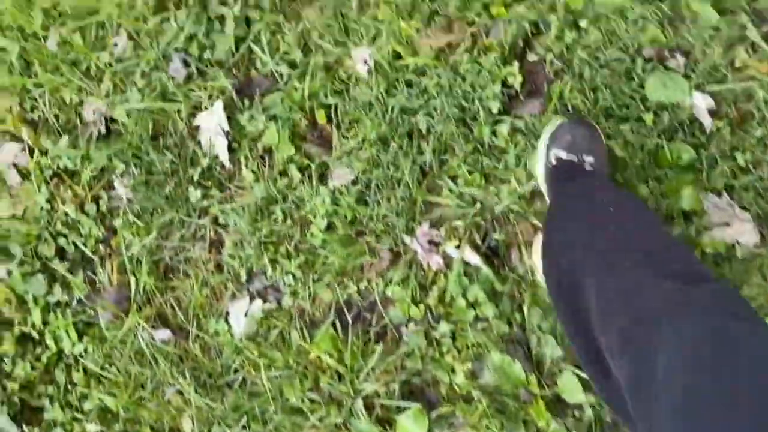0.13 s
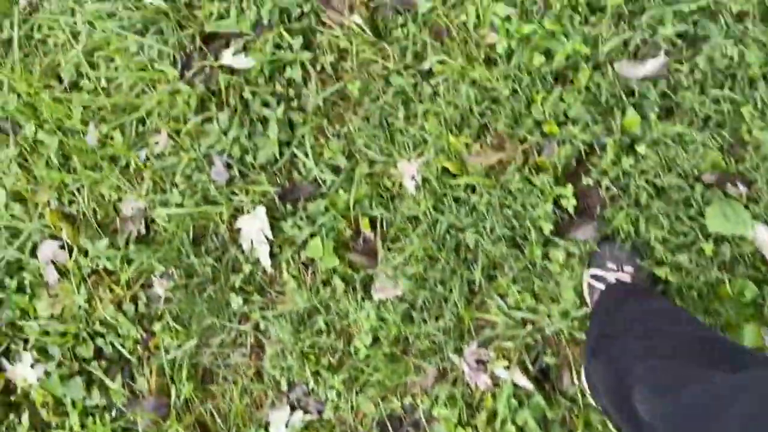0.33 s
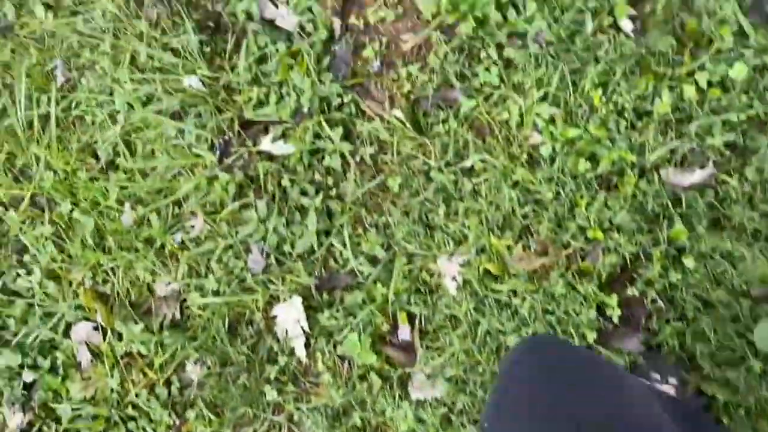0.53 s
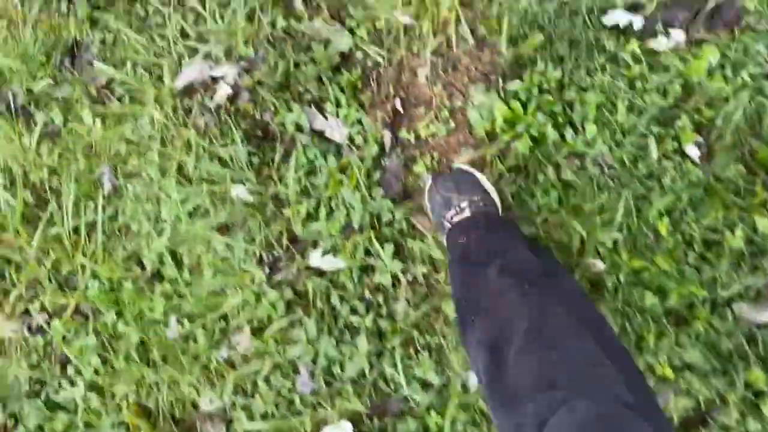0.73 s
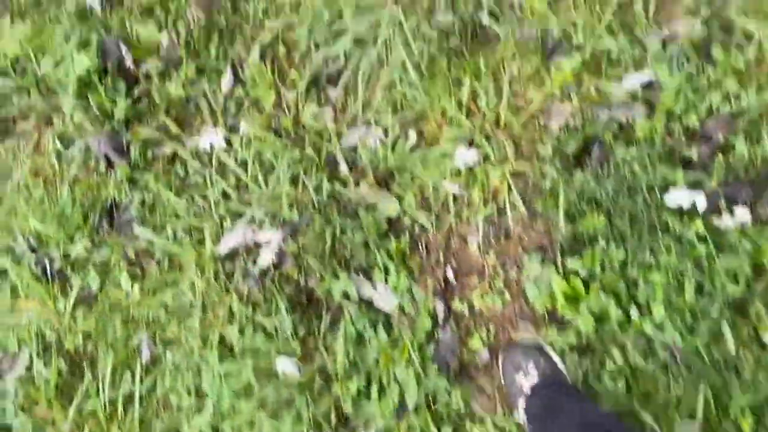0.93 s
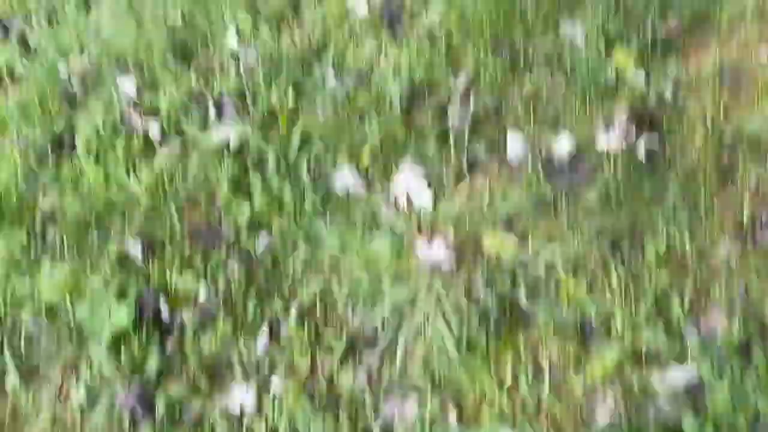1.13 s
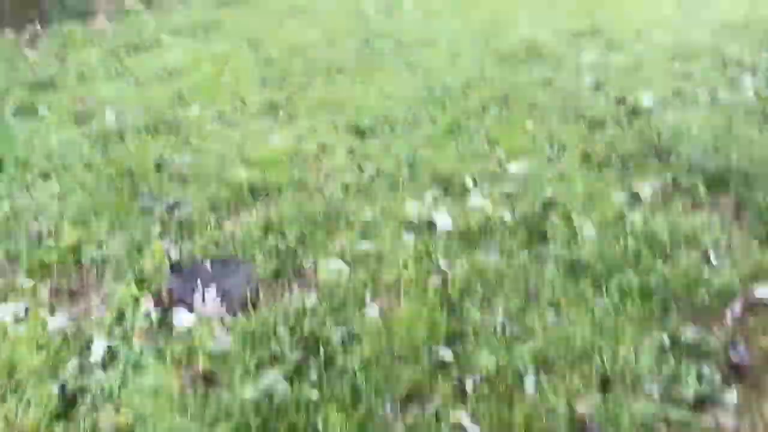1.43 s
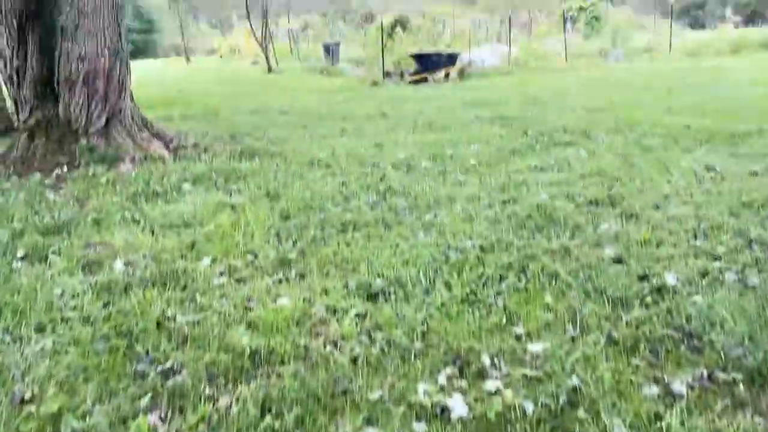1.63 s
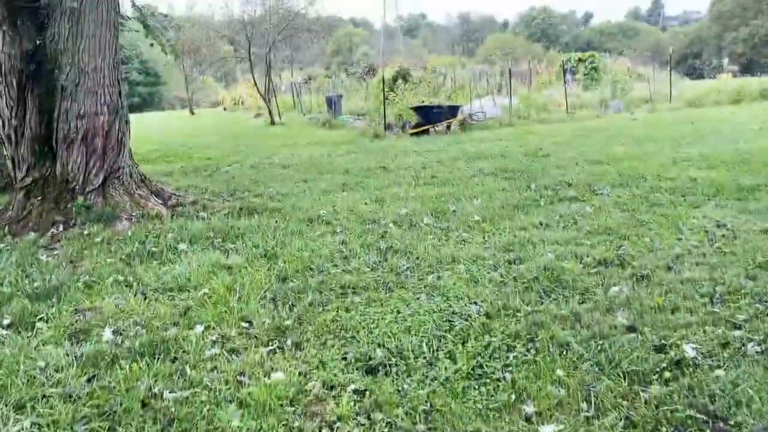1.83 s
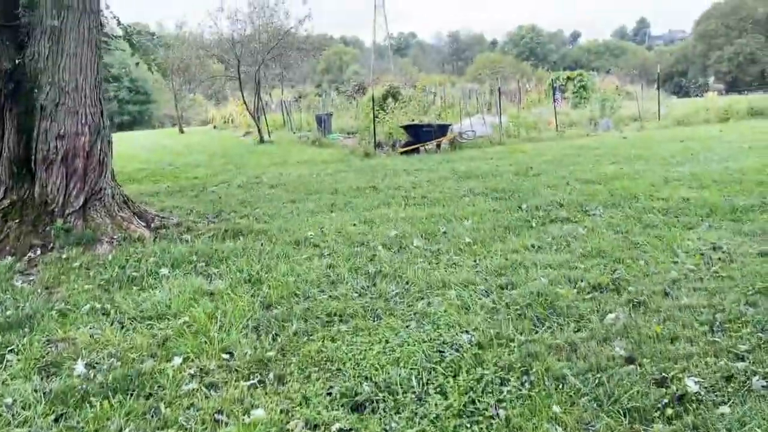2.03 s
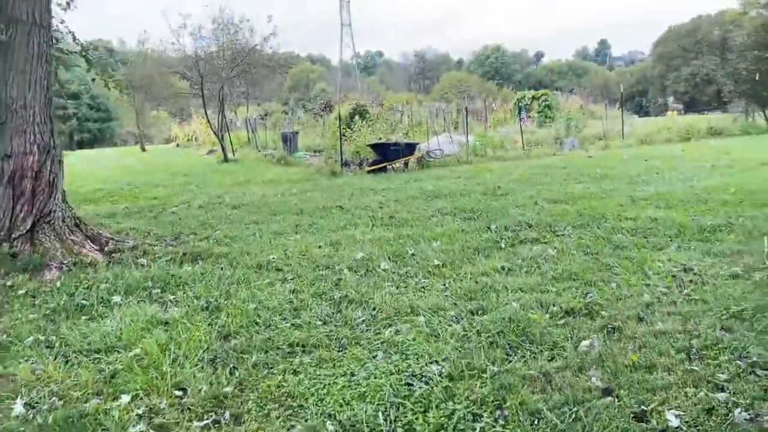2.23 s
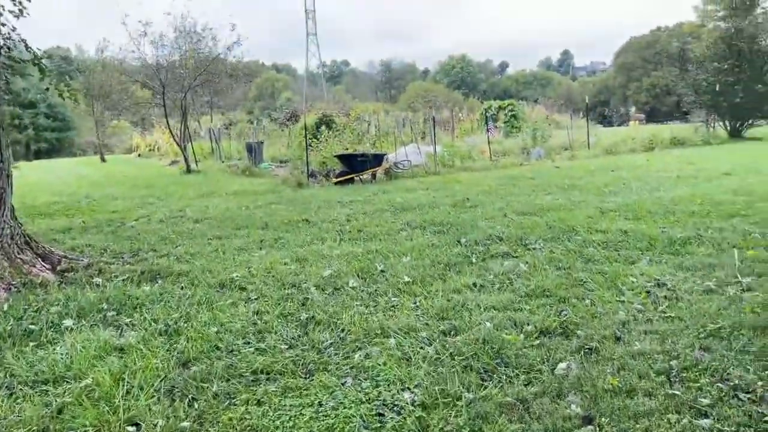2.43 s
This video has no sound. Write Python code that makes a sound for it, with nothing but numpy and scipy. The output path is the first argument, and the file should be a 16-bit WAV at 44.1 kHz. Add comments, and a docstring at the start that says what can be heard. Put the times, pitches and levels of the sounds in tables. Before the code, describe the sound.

Someone walks across an open lawn: brushing grass steps, dull low jolts and soft air rumble, then sparser steps as left-side cricket chirps grow clearer, with a far hollow knock and a last leaf crack.

```python
"""A walk across a lawn with a stereo microphone in the hand, 2.6 s, in order of time.
From the start: far insect hiss, two crickets trilling to the left, and close by, shoes swishing through grass (ticking
blades over noise), dry leaves snapping (cracks into resonances), jolts in the housing (sagging low swings with puffs)
and air rumbling on the ports (coloured noise). From 1.1 s a far dove coos (a gliding sine); from 1.85 s a third
cricket chirps in groups; at 2.2 s something knocks far off (noise hits into resonances); the last leaves snap at 2.3 s."""
import sys
import numpy as np
from scipy import signal
from scipy.fft import rfft, irfft
from scipy.io import wavfile

SR = 44100
rng = np.random.default_rng(int(sys.argv[2]) if len(sys.argv) > 2 else 0)


def inscribe(sig):
    """Save sig as 16-bit PCM at rate SR to the path in sys.argv[1].

    A 1-D sig is mono; a 2-D sig holds one channel per row.
    Samples are clipped to [-1, 1] before scaling.
    """
    pcm = np.round(np.clip(np.atleast_2d(sig).T, -1, 1) * 32767)
    wavfile.write(sys.argv[1], SR, pcm.astype(np.int16))


N = 114660
T = np.arange(N) / SR


def amp(db):
    """dB to gain."""
    return 10 ** (np.asarray(db) / 20)


def curve(rows, column=1):
    """One column of a time table, per sample."""
    return np.interp(T, [r[0] for r in rows], [r[column] for r in rows])


def at_hz(rows, column=1):
    """One column of a frequency table, per spectrum bin, interpolated over log frequency."""
    hz = np.maximum(np.fft.rfftfreq(N, 1 / SR), 5)   # keeps the log finite
    return np.interp(np.log(hz), np.log([r[0] for r in rows]), [r[column] for r in rows])


def colour(x, spectrum):
    """Give a signal a spectrum; rms 1."""
    y = irfft(rfft(x) * amp(at_hz(spectrum)), N)
    return y / np.sqrt(np.mean(y ** 2))


def bands(x, edges):
    """Band-pass between two edges in Hz."""
    return signal.sosfilt(signal.butter(2, edges, "band", fs=SR, output="sos"), x)


def split(x, hz):
    """Lower and upper part, which add back to the whole."""
    low = signal.filtfilt(*signal.butter(2, hz, fs=SR), x)
    return low, x - low


def drift(rate_hz):
    """Slow random wander of spread 1: noise through two equal low-pass poles."""
    r = np.exp(-2 * np.pi * rate_hz / SR)
    slow = signal.lfilter([1], [1, -2 * r, r * r], rng.standard_normal(N + SR))[SR:]
    return (slow - slow.mean()) / slow.std()


def ring(clicks, hz, t60):
    """Two-pole resonance: a unit click sets a decaying sine of height 1 ringing."""
    r, w = amp(-60 / (t60 * SR)), 2 * np.pi * hz / SR
    return signal.lfilter([0, np.sin(w)], [1, -2 * r * np.cos(w), r * r], clicks + 1e-18)


# Far insects and leaves, spectrum: f/Hz, level/dB per Hz (relative)
HISS_SPECTRUM = [(150, -26), (280, -7.5), (1400, -5), (2700, -11.5), (4300, -10), (5100, -3), (6700, -1),
                 (8300, -2), (9600, -2), (10200, 1), (11300, -7.5), (12200, -28.5), (13000, -74)]
# Swell of the hiss below the split: t/s, level/dB (relative)
HISS_SWELL = [(0, 1.5), (1.05, -2.5), (1.4, 3.5), (1.52, -7), (1.63, 1.5), (1.72, -10.5), (1.85, -4),
              (2.27, 3.5), (2.38, -4)]
HISS_DB, HISS_SPLIT_HZ = -57, 5100.0


def hiss():
    """Far insects and leaves: coloured noise whose lower part swells while the upper part holds steady."""
    noise = colour(rng.standard_normal((2, N)), HISS_SPECTRUM)
    low, high = split(noise, HISS_SPLIT_HZ)
    return amp(HISS_DB) * (amp(curve(HISS_SWELL)) * low + high)


# Dove, far to one side: t/s, f/Hz, level/dB
COO = [(1.1, 514, -74), (1.35, 513, -66.5), (1.58, 528, -65), (1.65, 540, -82)]


def dove():
    """A soft pure coo: one gliding sine, reaching the two ports out of step."""
    phase = 2 * np.pi * np.cumsum(curve(COO)) / SR
    port_lag = np.array([[0], [2.3]])   # radians
    sounding = (T > COO[0][0]) * (T < COO[-1][0])
    return amp(curve(COO, column=2)) * sounding * np.sin(phase + port_lag)


# Resonances of the far knock: f/Hz, level/dB (relative), t60/s
KNOCK_MODES = [(450, -13, .04), (980, -2, .05), (1090, -2, .025), (3300, -4, .004)]
KNOCK_S, KNOCK_DB, KNOCK_SCATTER_S = 2.208, -48.5, .03
KNOCK_CRACK_DB, KNOCK_CRACK_S = -44, .03   # this decay comes on top of the scatter's


def knock():
    """A far hollow knock: resonances struck by a dense decaying scatter of echoes, with a bright crack."""
    after = T - KNOCK_S
    since = np.maximum(after, 0)
    common, own = rng.standard_normal((2, N))
    echoes = common + .8 * own * np.array([[1], [-1]])   # partly different in each port
    hits = (after >= 0) * np.exp(-since / KNOCK_SCATTER_S) * echoes
    crack = bands(hits * np.exp(-since / KNOCK_CRACK_S), (1800, 4800))
    hits[:, int(KNOCK_S * SR)] += 8   # the direct blow, ahead of its echoes
    hollow = bands(sum(amp(db) * ring(hits, hz, t60) for hz, db, t60 in KNOCK_MODES), (380, 5000))
    hollow /= np.sqrt(np.sum(hollow ** 2) / (KNOCK_SCATTER_S * SR))
    return amp(KNOCK_DB) * hollow + amp(KNOCK_CRACK_DB) * crack


def pulse(length, start_hz, end_hz):
    """One wing stroke: a rounded tone sliding in pitch."""
    u = np.arange(int(length * SR)) / (length * SR)
    cycles = length * (start_hz * u + (end_hz - start_hz) * u * u / 2)
    return np.sin(np.pi * u) ** 2 * np.sin(2 * np.pi * cycles)


# Field cricket, chirp groups: t/s of first pulse, number of pulses, level/dB before placing
CHIRPS = [(1.851, 3, -55), (1.923, 3, -53.5), (1.991, 3, -52.5), (2.060, 4, -52), (2.126, 4, -51.5),
          (2.205, 4, -50.5), (2.272, 5, -50.5), (2.339, 5, -50), (2.418, 5, -49.5), (2.498, 4, -49),
          (2.565, 3, -50)]
CHIRP_PULSE_GAP_S, CHIRP_FIRST_DB, CHIRP_AFTER_DB = .0133, -4, -9   # a faint stroke follows each group


def chirping_cricket():
    """Wing strokes in short groups, the first softer, with slightly uneven timing and level; left of centre."""
    clicks = np.zeros(N)
    for s, n, db in CHIRPS:
        k = np.arange(n + 1)
        times = s + (k + rng.normal(0, .03, n + 1)) * CHIRP_PULSE_GAP_S
        at = np.minimum(times * SR, N - 1).astype(int)
        accent_db = CHIRP_FIRST_DB * (k == 0) + CHIRP_AFTER_DB * (k == n)
        clicks[at] = amp(db + accent_db + rng.normal(0, 1, n + 1))
    return signal.fftconvolve(clicks, pulse(.0115, 5650, 4530), "same") * amp([[3.5], [-4]])


# Two steady trills, each: pulse gap t/s, t/s of one pulse, pulse length t/s, start f/Hz, end f/Hz,
# left-right level/dB, level curve (t/s, level/dB)
LOW_TRILL = (.01596, 1.436, .010, 5450, 4750, 6, [(0, -67), (1.35, -65), (1.5, -59), (1.84, -55),
             (1.95, -61), (2.6, -65)])
HIGH_TRILL = (.0366, 1.417, .020, 6850, 6600, 5, [(0, -61), (1.3, -63), (1.45, -57), (2.6, -60)])


def trilling_crickets():
    """Two crickets repeat wing strokes at a nearly even pace, each stroke varying in strength; left of centre."""
    out = np.zeros((2, N))
    for gap, s, length, start_hz, end_hz, pan_db, level in (LOW_TRILL, HIGH_TRILL):
        times = s + gap * np.arange(-int(s / gap), int((N / SR - s) / gap) + 1)
        times = np.clip(times + rng.normal(0, .03 * gap, len(times)), 0, (N - 1) / SR)
        clicks = np.zeros(N)
        clicks[(times * SR).astype(int)] = amp(rng.normal(0, 2.5, len(times)))
        trill = signal.fftconvolve(clicks, pulse(length, start_hz, end_hz), "same")
        out += amp(curve(level)) * trill * amp([[pan_db / 2], [-pan_db / 2]])
    return out


# Air on the ports: t/s, level/dB
RUMBLE_LEVEL = [(0, -70), (.32, -57.5), (.62, -48), (.95, -50.5), (1.05, -52.5), (1.3, -46), (1.42, -54.5),
                (1.62, -48.5), (1.95, -41.5), (2.2, -57), (2.6, -55.5)]
# Its spectrum: f/Hz, level/dB per Hz (relative)
RUMBLE_COLOUR = [(22, -35), (45, 2), (80, 0.5), (130, -11), (320, -33), (600, -62)]


def rumble():
    """Air on the microphone ports: low coloured noise that swells and sinks, with a slight flutter in level."""
    level_db = curve(RUMBLE_LEVEL) + 0.59 * drift(24.0)
    return amp(level_db) * colour(rng.standard_normal((2, N)), RUMBLE_COLOUR)


# Jolts in the housing: t/s, level/dB of the swing, f/Hz it settles to, level/dB of puff against swing
THUDS = [(0.107, -45, 116, -27), (0.193, -40.5, 107, -3), (0.241, -41, 111, -5.5), (0.357, -39.5, 118, -14),
         (0.392, -36.5, 105, -10.5), (0.526, -36.5, 99, -9.5), (0.69, -30, 86.5, -46),
         (0.766, -38, 59.4, -29), (0.865, -31, 64, -22.5), (0.886, -27.5, 58.5, -16),
         (0.928, -30.5, 51.3, -42), (0.988, -37.5, 82.4, -39), (1.155, -31, 53.8, -26.5),
         (1.184, -34, 74.4, -20), (1.26, -37.5, 58.3, -15), (1.469, -39.5, 58, -25), (1.667, -34.5, 90, -9),
         (1.757, -33, 89, -29), (1.832, -32.5, 75, -11), (1.889, -39, 62.3, -24), (1.939, -35, 108, -34),
         (2.047, -31, 71, -18.5), (2.146, -41.5, 58.4, -29), (2.319, -43.5, 84.4, -14.5)]
THUD_CYCLES, THUD_SAG = 2.09, 0.29   # cycles in the swing's time unit; share by which it starts sharp
PUFF_HZ, PUFF_S = (90.0, 240.7), 0.0056


def thuds():
    """Each jolt is a short low swing that sags in pitch, with a puff of air noise; returns both."""
    swing, puff, after = np.zeros(N + SR), np.zeros(N + SR), T[:SR // 5]
    for s, db, hz, puff_db in THUDS:
        span = slice(int(s * SR), int(s * SR) + len(after))
        c = after * hz / THUD_CYCLES
        p = after / PUFF_S
        phase = 2 * np.pi * THUD_CYCLES * c * (1 + THUD_SAG * np.exp(-2 * c))
        swing[span] += amp(db) * 3 * c * np.exp(1 - 3 * c) * np.sin(phase)
        puff[span] += amp(db + puff_db) * p * np.exp(1 - p)
    air = bands(bands(rng.standard_normal((2, N)), PUFF_HZ), PUFF_HZ)
    return swing[:N], puff[:N] * air / air.std()


TREBLE_FROM_HZ = 1840   # parts body from treble in leaves and grass
# Dry leaves and stalks underfoot: t/s, level/dB, level/dB of body against treble, brightest f/Hz
SNAPS = [(.2243, -40, -12, 9500), (.2290, -43, -12, 9000), (.2645, -32, -3, 9100), (.2762, -42, -8, 8000),
         (.328, -45, -4, 3500), (.568, -46, -2, 3500), (.760, -43, 5, 2500), (1.883, -48, 5, 2500),
         (1.938, -47, 4, 2700), (2.112, -46, 5, 2500), (1.9865, -38, -16, 7400), (2.3243, -30, -6, 5800),
         (2.3285, -36, -3, 11000)]
# Leaf resonances: f/Hz, level/dB (relative), t60/s
LEAF_MODES = [(1500, -6, 0.014), (2900, -1, 0.005), (4700, 0, 0.004), (7300, 1, 0.004), (9120, 0, 0.005),
              (11400, 4, 0.004)]
SNAP_SPREAD_S, SNAP_LOSS_DB_PER_OCTAVE = .0003, 11


def snaps():
    """Each snap is a very short noisy crack into the leaf resonances, its treble strongest near its bright pitch."""
    out, after = np.zeros(N), T[:SR // 300]
    for hz, db, t60 in LEAF_MODES:
        clicks = np.zeros(N)
        for s, peak_db, body_db, bright_hz in SNAPS:
            off_octaves = abs(np.log2(hz / bright_hz))
            tilt_db = body_db if hz < TREBLE_FROM_HZ else -SNAP_LOSS_DB_PER_OCTAVE * off_octaves
            crack = rng.standard_normal(len(after)) * np.exp(-after / SNAP_SPREAD_S)
            crack /= np.sqrt(np.sum(crack ** 2))
            clicks[int(s * SR):int(s * SR) + len(after)] += amp(peak_db + db + tilt_db) * crack
        out += ring(clicks, hz, t60)
    return bands(out, (600, 14000))


# Shoes through grass: t/s of full level, hold t/s, level/dB (before a common lift), level/dB of treble against body
SWISHES = [(0, 0.049, -57.5, 0), (0.187, 0.041, -58, 2.5), (0.255, 0.043, -63, 8), (0.42, 0.075, -56, 0),
           (0.526, 0.099, -62, -33), (0.671, 0.098, -54, 2), (0.872, 0.018, -51.5, -10),
           (0.947, 0.039, -57, -6), (1.302, 0.033, -58.5, -30), (1.324, 0.14, -61.5, -0.5),
           (1.893, 0.0064, -54, -12), (2.049, 0.014, -60, 0.5), (2.115, 0.0069, -50, -6)]
# Grass spectrum: f/Hz, level/dB per Hz (relative)
GRASS = [(150, -74), (350, -5), (1500, -4.5), (3500, -8), (6200, -13.5), (9000, -5), (10200, 1.5),
         (11400, -9.5), (12400, -24), (13400, -21)]
SWISH_RISE_DB_PER_S, SWISH_FALL_DB_PER_S, SWISH_LIFT_DB = 434, 904, 4.0
BLADES_PER_S, BLADE_SPREAD_DB, BLADE_SHARE = 9000, 5.5, 0.58


def grass():
    """Blades tick at many pitches, each band flickering in level, over the smooth noise of friction; two ports."""
    struck = rng.random((2, N)) < BLADES_PER_S / SR
    sizes = amp(BLADE_SPREAD_DB * np.minimum(rng.exponential(1, (2, N)), 3))
    ticks = struck * sizes * rng.choice([-1, 1], (2, N))
    edges, dealt = np.geomspace(200, 16000, num=8), rng.integers(0, 7, (2, N))   # a band for each tick
    blades = 0
    for k in range(7):
        blades = blades + amp(3.5 * drift(40)) * bands(ticks * (dealt == k) + 1e-18, edges[k:k + 2])
    friction = rng.standard_normal((2, N))
    return colour(BLADE_SHARE * blades / blades.std() + (1 - BLADE_SHARE) * friction, GRASS)


def swishes():
    """Shoes stroke the grass under rise-hold-fall envelopes, body and treble weighed apart, with a fast flicker."""
    body, treble = np.zeros(N), np.zeros(N)
    for s, hold, db, treble_db in SWISHES:
        rise_db = SWISH_RISE_DB_PER_S * np.maximum(s - T, 0)
        fall_db = SWISH_FALL_DB_PER_S * np.maximum(T - s - hold, 0)
        gain = amp(db - rise_db - fall_db)
        body += gain
        treble += amp(treble_db) * gain
    low, high = split(grass(), TREBLE_FROM_HZ)
    return amp(SWISH_LIFT_DB + 1.0 * drift(58)) * (body * low + treble * high)


# The microphone's pair of ports: f/Hz, left-right likeness (0 to 1), left-right level/dB, right's lead [rad]
PORTS = [(60, .82, 0, 0), (1200, .86, -1.5, .2), (2400, .95, 0, 0), (3500, .8, 4, -.3), (5300, .35, 6, -.6),
         (6900, .4, 4, -.3), (7600, .8, 3, -1.2), (8600, .92, 1, .2), (10250, .94, 0, 3.14),
         (11900, .9, 0, 6.28)]


def ports(common, own):
    """Both ports hear the common sound; the own part enters them with opposite sign; level and phase then differ."""
    alike = at_hz(PORTS)
    turn = amp(at_hz(PORTS, column=2) / 2) * np.exp(-.5j * at_hz(PORTS, column=3))
    a = rfft(common) * np.sqrt((1 + alike) / 2)
    b = rfft(own) * np.sqrt((1 - alike) / 2)
    return irfft(np.array([(a + b) * turn, (a - b) / turn]), N)


def scene():
    """Hiss and near sounds pass through the ports; crickets, dove and knock are placed directly."""
    spread = rumble() + hiss()
    swing, puff = thuds()
    spread = spread + puff + swishes()
    common = spread[0] + snaps() + swing
    own = spread[1] + np.roll(swing, SR // 320)   # the swing about 3 ms later
    return ports(common, own) + chirping_cricket() + trilling_crickets() + dove() + knock()


def record(dry):
    """The microphone's top is cut: a steep low-pass, 70 dB down from 15.8 kHz."""
    return signal.sosfilt(signal.cheby2(12, 70, 15800, fs=SR, output="sos"), dry)


dry = scene()
out = record(dry)
inscribe(out)
```